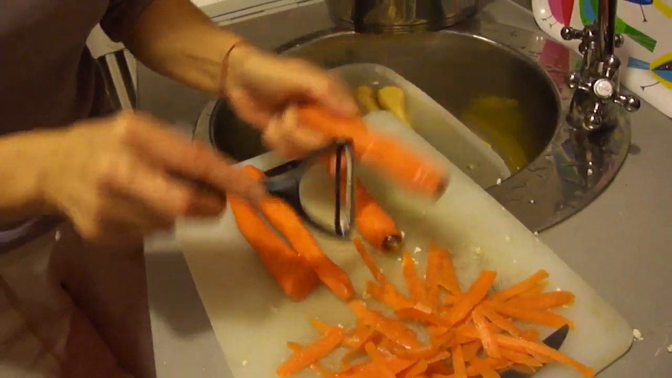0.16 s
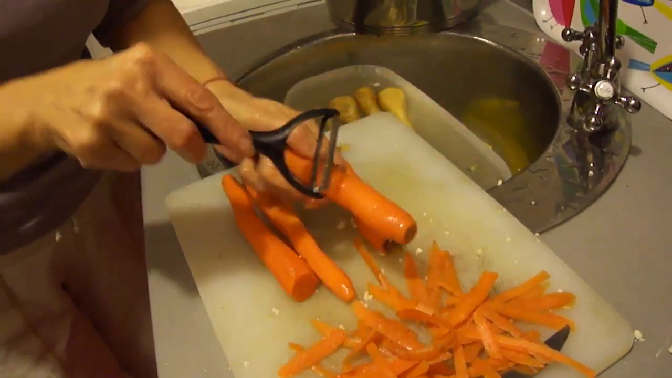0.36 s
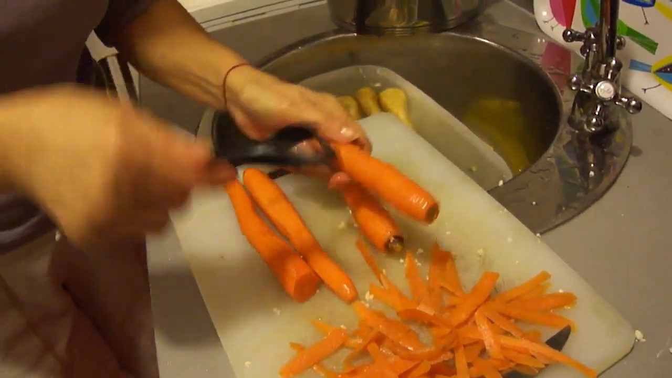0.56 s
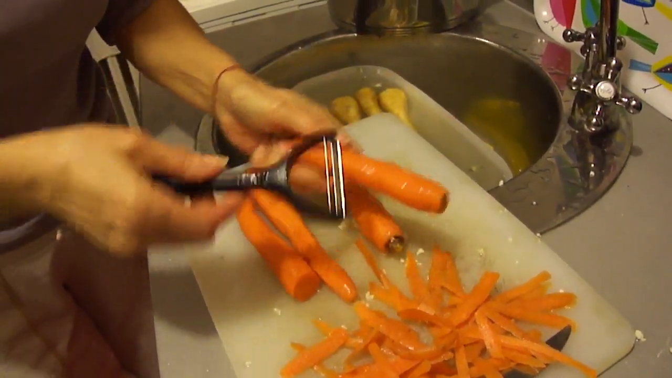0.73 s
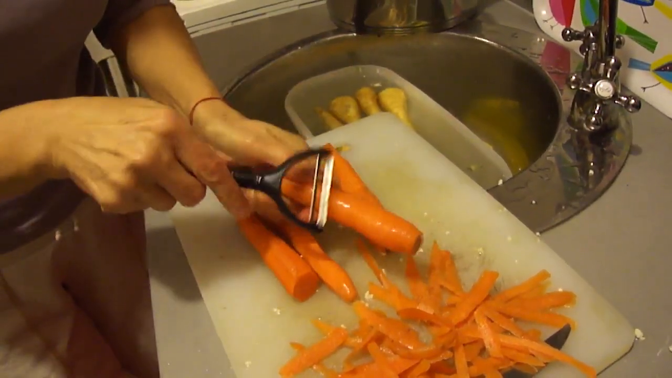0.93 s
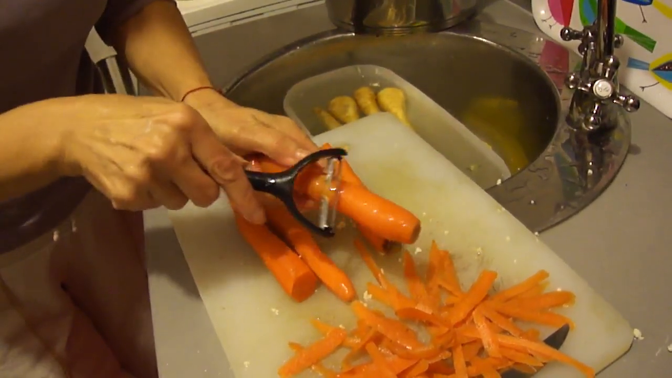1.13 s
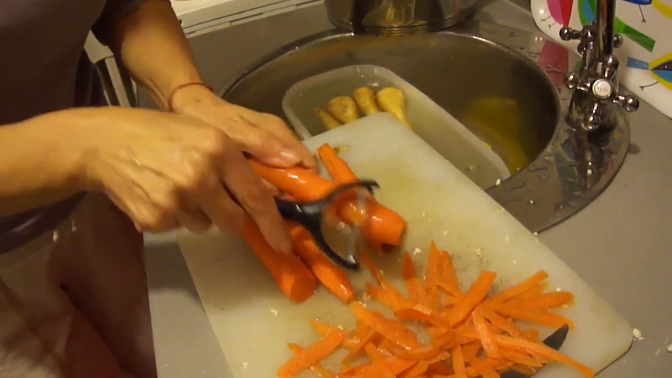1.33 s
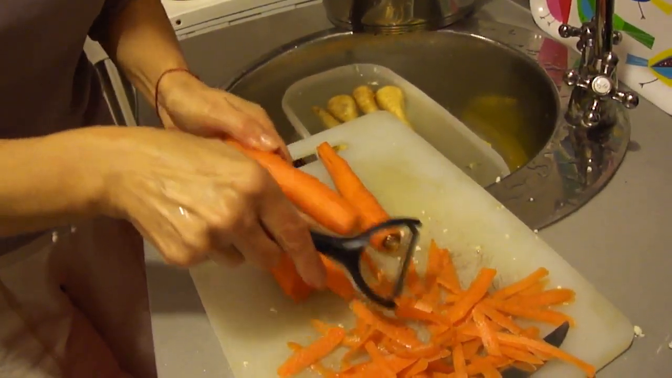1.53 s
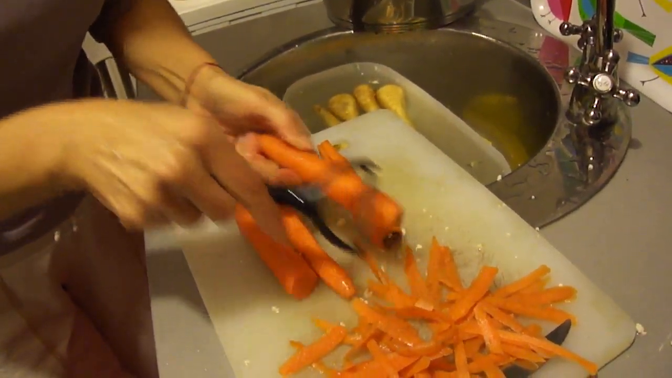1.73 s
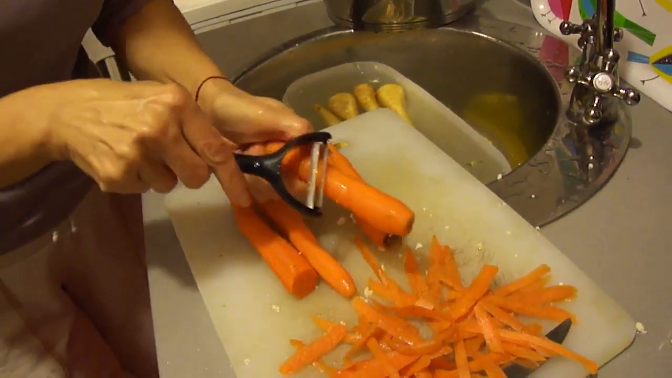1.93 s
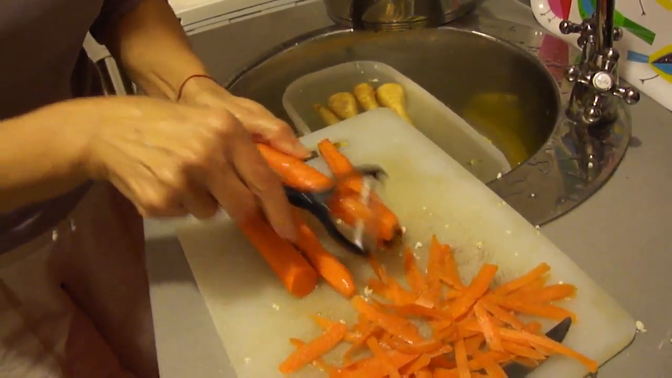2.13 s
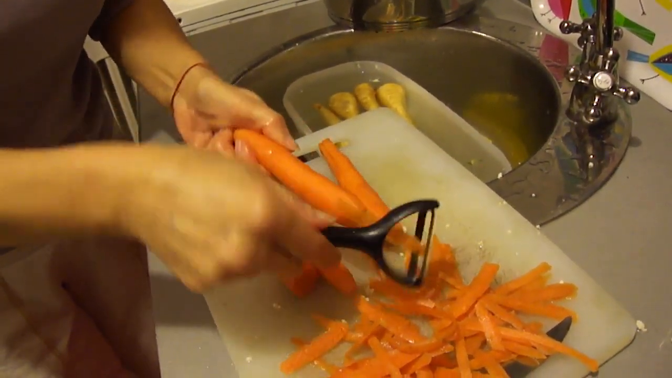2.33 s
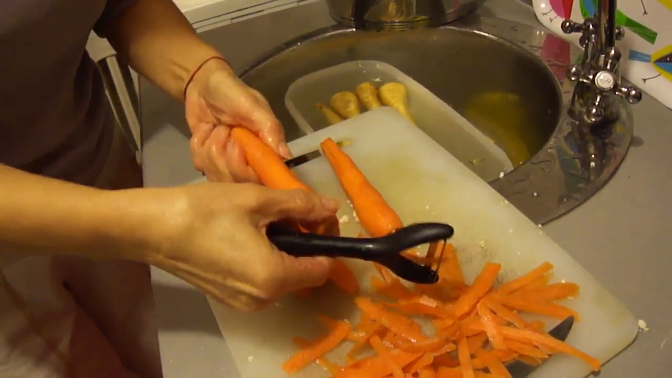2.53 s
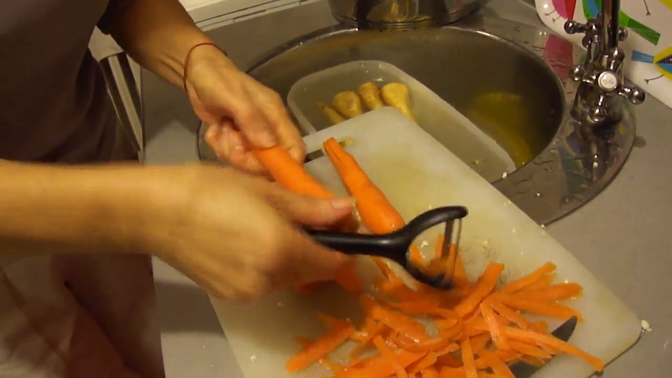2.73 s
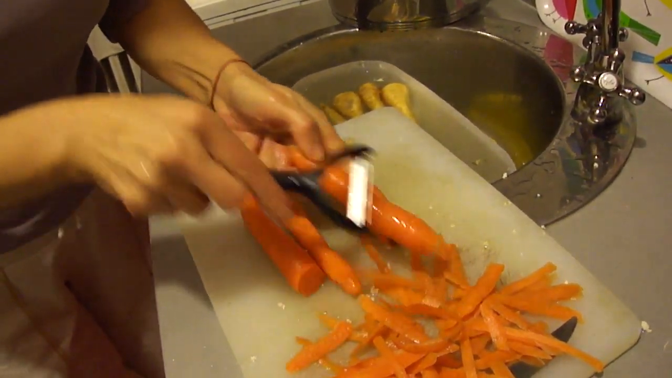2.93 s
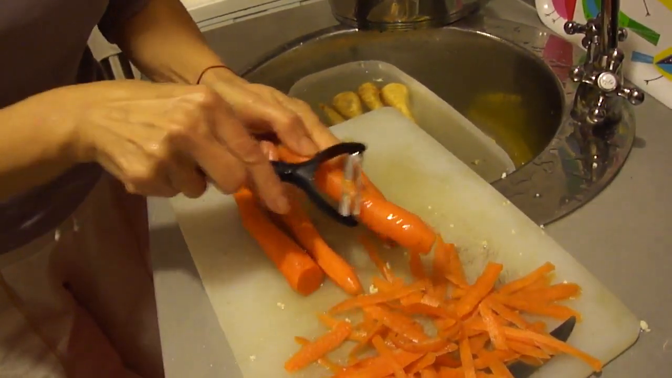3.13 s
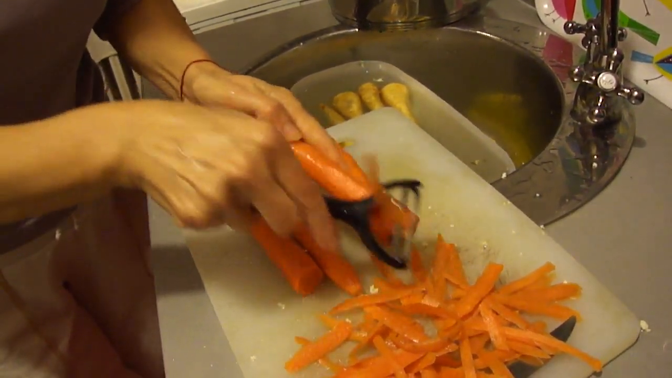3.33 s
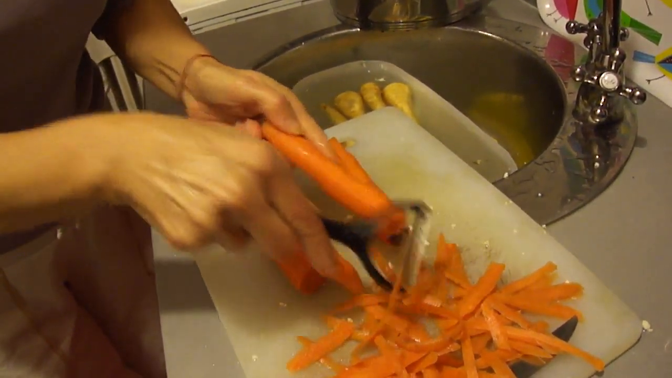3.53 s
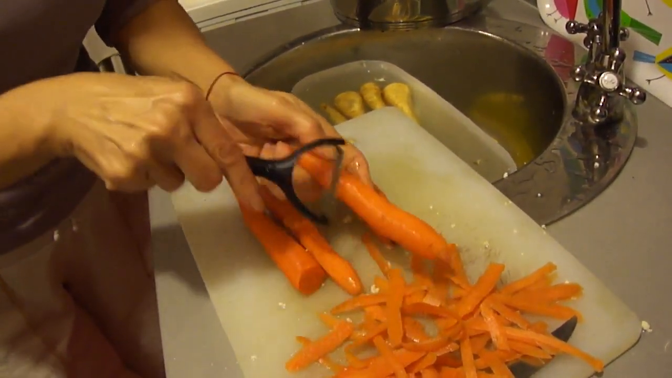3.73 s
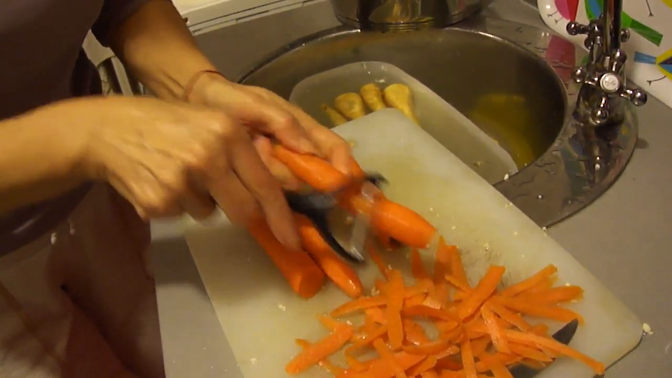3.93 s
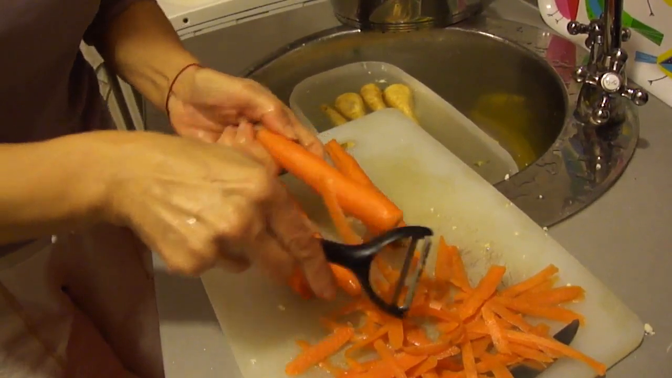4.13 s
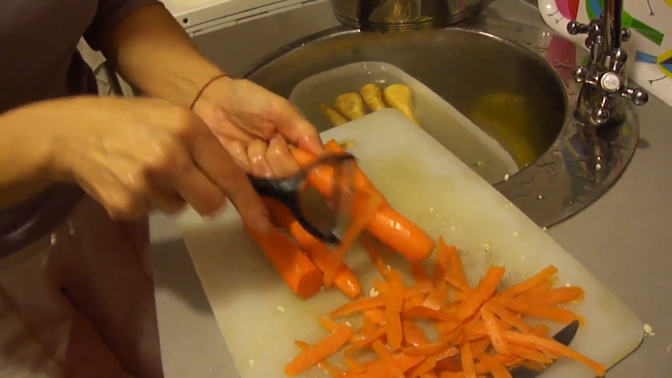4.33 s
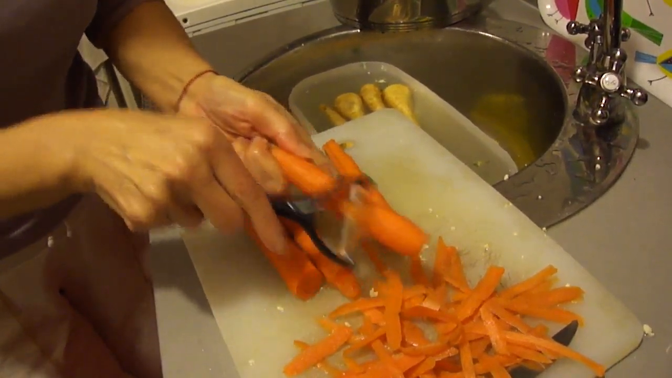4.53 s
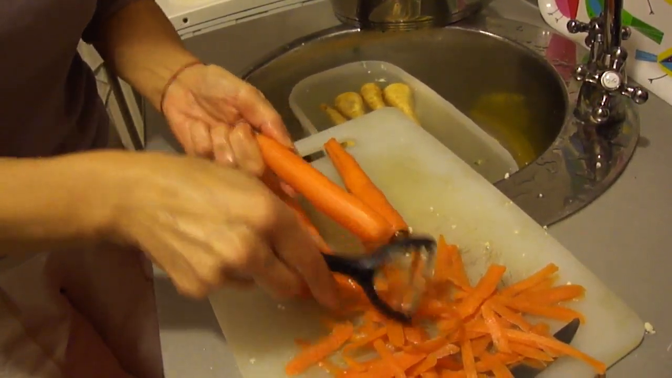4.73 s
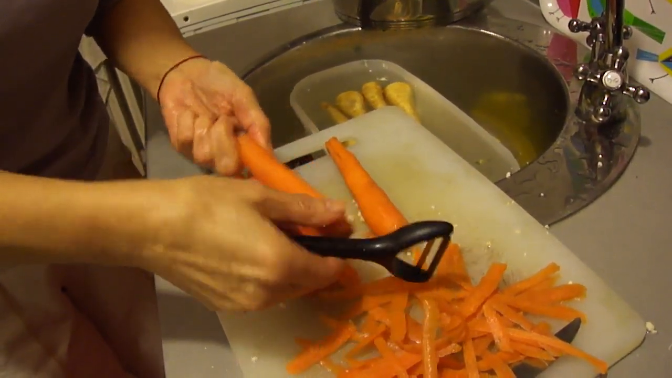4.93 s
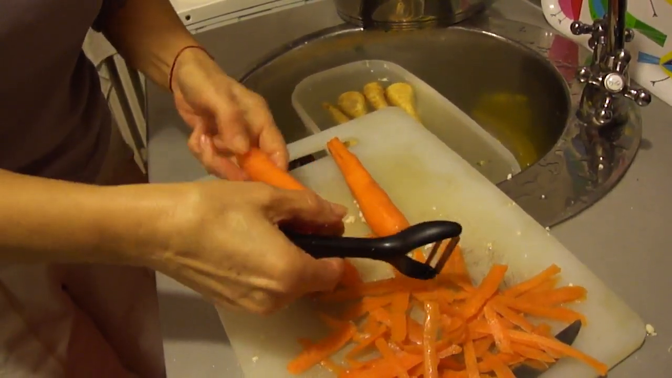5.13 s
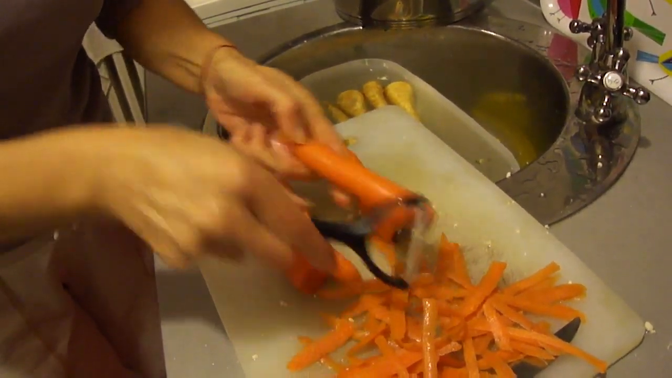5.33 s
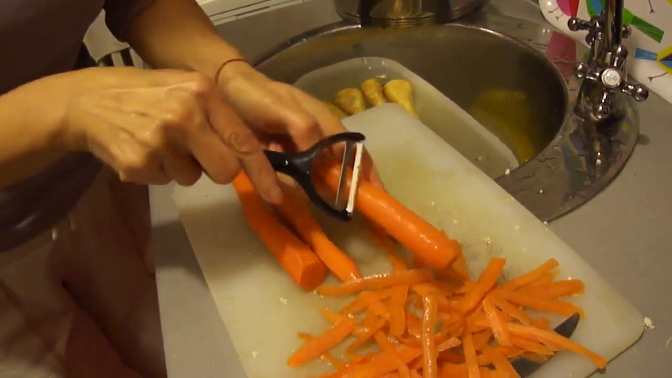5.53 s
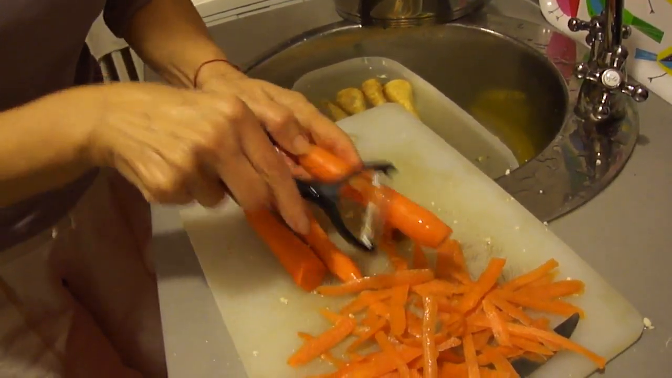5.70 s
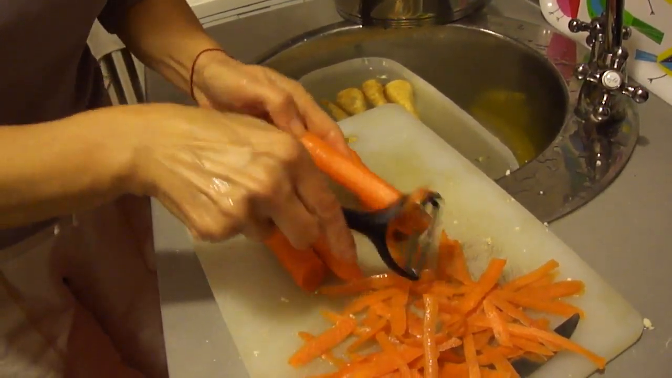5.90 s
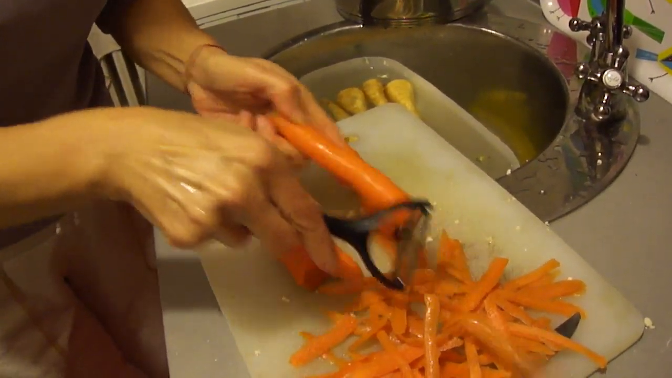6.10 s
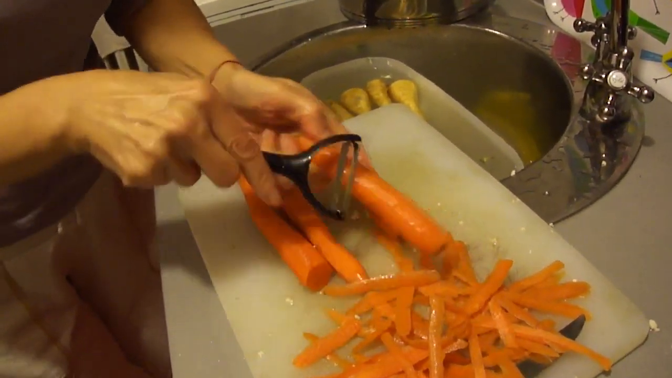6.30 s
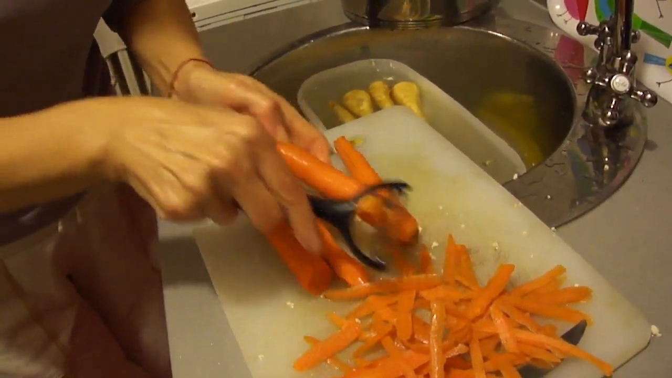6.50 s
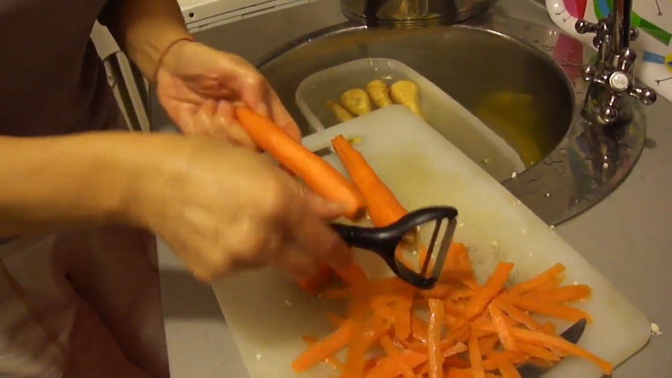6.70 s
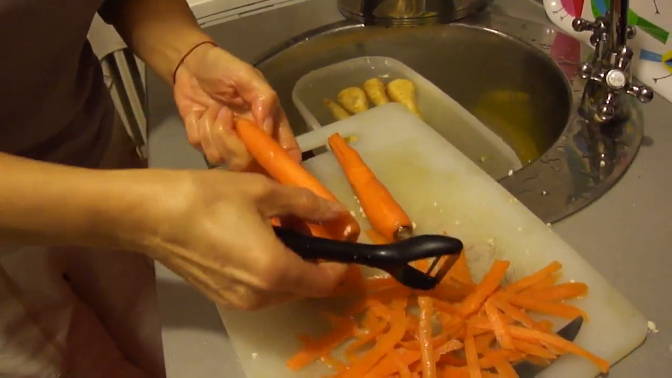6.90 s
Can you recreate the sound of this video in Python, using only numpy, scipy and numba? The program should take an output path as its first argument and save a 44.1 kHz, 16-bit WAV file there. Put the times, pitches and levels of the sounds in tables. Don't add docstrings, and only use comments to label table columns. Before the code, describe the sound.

Bright, hard clacks of a loose peeler blade introduce crunchy, fibrous scrapes along wet carrots. Short quick cuts come first, then strokes of about a third of a second that swell and fade toward the tip. Between groups come small metallic-plastic rattles and brief quiet gaps. The sound is close and mono, with a short kitchen reflection, steady soft hum and slightly overloaded loudest knocks.

```python
import sys
import numpy as np
from scipy import signal
from scipy.fft import rfft, irfft, next_fast_len
from scipy.io import wavfile
from numba import njit

SR = 44100
rng = np.random.default_rng(int(sys.argv[2]) if len(sys.argv) > 2 else 0)


def to_wav(sig):
    pcm = np.clip(np.atleast_2d(sig), -1, 1) * 32767
    pcm = np.round(pcm).astype(np.int16)
    wavfile.write(sys.argv[1], SR, pcm.T)


def rack_gain(trim_db):
    fader = np.asarray(trim_db, float)
    return 10 ** (fader / 20)


N = 306936

# [f/Hz, level/dB per Hz]
HUM_SPECTRUM = [(18, -28), (40, -27), (75, -14), (160, -3.5), (260, 0.5), (500, -2.5), (1170, -5),
                (1700, -9.5), (2500, -13), (4400, -17.5), (7000, -20.5), (9000, -22), (10800, -24.5),
                (22000, -70)]
HUM_DB = -48
# [f/Hz, level/dB rms]
MACHINE_TONES = [
    (88, -69),
    (7881, -70.5),
]

# [t/s, peak level/dB, low mode f/Hz, brightness/dB]
LANDINGS = [
    (1.1369, 0, 3800, -1.5),
    (2.0606, -1, 4300, 42),
    (2.38, -6, 2740, 21),
    (2.4892, -5.5, 3840, 0.5),
    (3.2517, -0.5, 3660, 4),
    (3.2543, -6, 3470, -4),
    (4.595, 0.5, 3820, -0.5),
    (5.7385, -11, 3500, 3),
    (6.165, -23, 3800, 0),
]
# [t/s, peak level/dB, low mode f/Hz, brightness/dB]
STOP_SLAMS = [
    (1.5599, -3.5, 4020, 16),
    (3.9388, 0, 4500, -2),
    (4.2318, -9.5, 2940, 0.5),
    (6.4982, 1.5, 4300, -4),
]
# [t/s, peak level/dB, low mode f/Hz, brightness/dB]
BLADE_FLIPS = [(0.0502, -16.5, 4030, -3), (.4534, -42, 2700, 12), (0.673, -22.5, 4500, -8),
               (2.6848, -30.5, 2400, -6), (2.887, -36, 3200, -7), (3.1342, -34.5, 2820, -19),
               (3.691, -15.5, 2310, -4.5), (4.8872, -18, 2680, 0), (4.9974, -41, 2800, 3),
               (5.0686, -9, 3230, -2.5), (5.1734, -30.5, 3170, -2), (5.4495, -35.5, 4550, -6),
               (6.1183, -16, 3020, -7), (6.1505, -30, 3210, -10), (6.2474, -32, 2870, -13),
               (6.2603, -22, 2790, -2), (6.7676, -17, 2720, 7), (6.935, -27.5, 4480, -9),
               (.4354, -40, 2700, 14), (2.148, -16, 3630, -15), (.635, -33, 4000, -6)]
# [t/s, peak level/dB, low mode f/Hz]
AIR_RATTLES = [(0.2295, -27, 4050), (0.617, -23, 4020), (0.6883, -27, 4050), (0.7922, -26.5, 3520),
               (0.9131, -19.5, 3200), (0.9385, -22.5, 4250), (0.9798, -21, 4200), (1.016, -26, 4300),
               (2.593, -28, 3180), (2.6564, -37.5, 3060), (2.7407, -38, 3030), (2.791, -29, 3140),
               (2.938, -51, 3350), (3.202, -22, 3940), (3.7608, -23, 3770), (5.181, -28.5, 4000),
               (5.397, -36.5, 3020), (5.6397, -38, 2850), (5.717, -23, 4300), (6.2545, -27, 3240),
               (6.2731, -23, 2330)]
# [t/s, peak level/dB, low mode f/Hz]
ROOT_RATTLES = [(1.4333, -14, 3680), (1.697, -17, 2530), (1.7134, -22, 2420), (3.5786, -17, 4300),
                (3.6186, -24, 2960), (3.952, -13.5, 3370), (4.0814, -31, 3570), (4.8719, -13.5, 4500),
                (5.7276, -30, 4070), (6.0854, -21, 3980), (6.8046, -15, 3000), (6.817, -27, 2710)]
AIR_BRIGHT_DB, ROOT_BRIGHT_DB = -6.5, -5.5
# [high mode f/Hz, chatter T60/s]
KNOCK_KINDS = [
    (4990, 0.041),
    (8440, 0.012),
    (8070, 0.074),
    (5350, 0.052),
    (5200, 0.036),
]
# [f/Hz, width/Hz, level/dB]
FRAME_MODES = [(2620, 1100, -1.5), (3086, 46, 8), (4050, 630, 8), (4563, 120, 19.5), (5290, 620, 13),
               (6120, 270, 8.5), (7600, 1200, -8), (8260, 260, -6), (10600, 1350, -22)]
# [f/Hz, T60/s, [(start t/s, level/dB)]]
STEEL_RINGS = [(8740, 0.09, [(3.693, -31.5), (5.0705, -24.5), (6.118, -30), (6.768, -38)]),
               (7980, .036, [(4.08, -37), (6.768, -27)]), (7700, 0.13, [(5.07, -35)]),
               (7280, 0.083, [(.69, -43)]), (5450, 0.054, [(.916, -25.5), (.982, -29), (2.491, -41),
               (5.072, -29)]), (4500, 0.062, [(5.069, -26), (6.936, -28.5)]),
               (4130, 0.024, [(.231, -27.5)]), (3047, 0.035, [(.795, -29.5), (.916, -21.5), (2.792, -42),
               (6.498, -19)]), (2700, 0.049, [(2.062, -14), (2.38, -16)]), (2500, 0.065, [(1.15, -24),
               (1.7, -30), (1.716, -31), (2.385, -25), (3.693, -40)]), (1925, 0.025, [(.796, -35),
               (.917, -29)]), (1190, 0.043, [(.689, -41), (2.49, -31), (3.694, -33), (5.07, -36)]),
               (1420, 0.19, [(6.565, -33), (6.585, -28.5)]), (920, 0.053, [(5.072, -36.5)]),
               (787, .044, [(1.825, -32.5)])]
# [t/s, level/dB]
AIR_THUDS = [
    (1.137, -22),
    (1.56, -19),
    (2.061, -16),
    (2.38, -24),
    (3.251, -22),
    (3.939, -15.5),
    (4.595, -23),
    (6.497, -21.5),
]
KITCHEN_T60_S, KITCHEN_DB = 0.19, -10.5

# [f/Hz, level/dB per Hz]
CELL_HISS = [(530, 10), (900, -24.5), (1530, -18.5), (1940, -18), (2370, -15), (3200, -4.5), (3590, -4),
             (5440, -9.5), (6100, -10.5), (7580, -14), (10800, -14), (14000, -24), (22000, -120)]
# [f/Hz, width/Hz, level/dB]
SKIN_MODES = [(2420, 155, 4.5), (2804, 74, 6.5), (2998, 130, 6), (2150, 68, -5.5), (1840, 260, -9)]
# [f/Hz, width/Hz, level/dB]
CORE_MODES = [(1220, 140, 1), (1410, 58, -5), (1535, 180, -6.5)]
# [t/s, level/dB]
SHORT_CUTS = [
    [(1.148, -29), (1.184, -45), (1.23, -54), (1.236, -46)],
    [(1.243, -28), (1.301, -29.5), (1.345, -68), (1.355, -43)],
    [(1.367, -21.5), (1.441, -21.5), (1.455, -48), (1.47, -38)],
    [(1.482, -29), (1.53, -20.5), (1.538, -24), (1.556, -27)],
    [(2.07, -23), (2.13, -42), (2.142, -37)],
    [(3.262, -35), (3.29, -27), (3.338, -51.5), (3.342, -32)],
    [(6.06, -54), (6.064, -48.5), (6.118, -39.5), (6.2, -73)],
]
# [t/s, level/dB]
LONG_CUTS = [
    [(1.572, -37), (1.592, -32.5), (1.644, -38.5), (1.654, -45), (1.688, -49), (1.698, -45), (1.774, -68),
     (1.78, -69)],
    [(2.149, -30), (2.211, -27.5), (2.229, -34), (2.237, -28.5), (2.317, -32), (2.385, -38.5), (2.401, -57),
     (2.47, -62)],
    [(3.35, -28), (3.358, -27.5), (3.434, -27.5), (3.448, -29.5), (3.542, -30), (3.55, -34), (3.578, -46),
     (3.67, -58.5)],
    [(3.946, -32), (3.954, -36), (3.964, -37), (3.998, -30.5), (4.106, -23.5), (4.24, -36), (4.242, -43),
     (4.31, -67.5)],
    [(4.602, -31), (4.606, -42), (4.62, -28.5), (4.704, -21), (4.756, -28.5), (4.78, -25.5), (4.872, -37.5),
     (4.94, -70)],
    [(5.722, -38.5), (5.738, -33.5), (5.826, -35), (5.844, -25), (6.0, -30), (6.016, -51), (6.028, -42),
     (6.05, -39)],
    [(6.505, -26), (6.513, -30), (6.587, -22), (6.679, -25.5), (6.799, -50), (6.807, -42), (6.835, -69),
     (6.86, -63.5)],
]
# [skin level/dB, skin gain toward tip/dB, juice level/dB, core level/dB, starting blade resonance f/Hz]
CARROT_SPOTS = [(10, -7, 3.5, 3, 4260), (1.5, 3, -3, -3, 3560), (0, 13, -4, 0, 3560),
                (-2.5, 5, 1, -4, 3530), (8, 7, 4.5, 3.5, 3800), (8, 0, -2, -2, 3470),
                (-7.5, 21.5, 5, -4, 3550), (0, 6, 0, 0, 3550), (-2, 7.5, 0, -2, 3530),
                (-1.5, 8.5, 3, 0.5, 3490), (4.5, -0.5, 0.5, -2.5, 3490), (-5.5, 11.5, 2, -2, 3420),
                (2.5, 7, 3, 5, 3800), (4.5, 1.5, 2, 1, 3580)]
FIRM_DB, LIGHT_DB, GRAZE_DB = -27.5, -42.5, -47
SKIN_DB, SKIN_GAIN = -10.5, 0.56
JUICE_DB, JUICE_GAIN, JUICE_TIP_DB = -9.5, 0.4, 0.5
CORE_DB, CORE_GAIN, CORE_TIP_DB = -23.5, 0.99, 4
BLADE_RISE_HZ_PER_S = 660

# [t/s, f/Hz, width/Hz, level/dB, half length/s]
FINGER_SLIP = (5.525, 5700, 350, -51, .018)
MIC_CUTOFF_HZ = 11000


def rms_one(x):
    return x / np.sqrt(np.mean(x ** 2) + 1e-20)


def coloured(x, points):
    size = next_fast_len(len(x))
    hz = np.maximum(np.arange(size // 2 + 1) * SR / size, 1)
    point_hz, point_db = np.array(points).T
    gain = rack_gain(np.interp(np.log(hz), np.log(point_hz), point_db))
    return rms_one(irfft(rfft(x, size) * gain, size)[:len(x)])


def drift(rate_hz):
    r = np.exp(-2 * np.pi * rate_hz / SR)
    wander = signal.lfilter([1], [1, -2 * r, r * r], rng.standard_normal(N + 9000))
    return rms_one(wander[9000:])


def resonance(x, hz, width_hz):
    r = np.exp(-np.pi * width_hz / SR)
    turn = np.cos(2 * np.pi * hz / SR)
    return signal.lfilter([(1 - r * r) / 2, 0, (r * r - 1) / 2], [1, -2 * r * turn, r * r], x)


def modes(x, table):
    return sum(rack_gain(db) * resonance(x, hz, width) * (-1) ** k for k, (hz, width, db) in enumerate(table))


def hum():
    out = rack_gain(HUM_DB + 0.5 * drift(0.88)) * coloured(rng.standard_normal(N), HUM_SPECTRUM)
    for hz, db in MACHINE_TONES:
        phase = 2 * np.pi * np.cumsum(hz * (1 + 0.002 * drift(20))) / SR
        out += rack_gain(db + 3 + 0.9 * drift(5)) * np.sin(phase)
    return out


def knocks():
    air = [(*row, AIR_BRIGHT_DB) for row in AIR_RATTLES]
    root = [(*row, ROOT_BRIGHT_DB) for row in ROOT_RATTLES]
    groups = [LANDINGS, STOP_SLAMS, BLADE_FLIPS, air, root]
    return [(s, db, low_hz, high_hz, bright_db, t60)
            for rows, (high_hz, t60) in zip(groups, KNOCK_KINDS)
            for s, db, low_hz, bright_db in rows]


def pivot_clacks(out, t):
    low = signal.butter(3, [2450, 5200], "band", fs=SR, output="sos")
    high = signal.butter(2, 5000, "high", fs=SR, output="sos")
    under = signal.butter(1, [500, 2300], "band", fs=SR, output="sos")
    for s, db, low_hz, high_hz, bright_db, t60 in knocks():
        contact = rack_gain(-60 * t / 0.0041)
        train = rack_gain(-9.5 - 60 * t / max(t60, 0.004))
        shape = (1 - np.exp(-t / 0.00057)) * (contact + train)
        chatter = rng.standard_normal(len(t)) * (rng.random(len(t)) < 0.5) * shape
        chatter[8] += 1.2

        uneven_db = rng.normal(0, 2.5, len(FRAME_MODES))
        struck = [(hz, width, level + g) for (hz, width, level), g in zip(FRAME_MODES, uneven_db)]
        frame = chatter + rack_gain(-4.5) * modes(chatter, struck)
        dull = signal.sosfilt(low, frame + rack_gain(11) * resonance(chatter, low_hz, 400))
        bright = signal.sosfilt(high, frame + rack_gain(8) * resonance(chatter, high_hz, 500))
        knock = dull / np.abs(dull).max()
        knock += rack_gain(bright_db + 4.5) * bright / np.abs(bright).max()
        knock += rack_gain(-2.0) * signal.sosfilt(under, chatter) / np.abs(chatter).max()

        lead_in = rng.standard_normal(300) * rack_gain(np.linspace(-52, -20, 300))
        start = round(s * SR)
        out[start - 300:][:300] += rack_gain(db) * signal.sosfilt(low, lead_in)
        out[start:][:len(t)] += rack_gain(db - 0.05) * knock / np.abs(knock).max()


def steel_rings(out, t):
    for hz, t60, hits in STEEL_RINGS:
        ring = np.sin(2 * np.pi * hz * t) * (1 - np.exp(-t / 0.00021))
        for s, db in hits:
            out[round(s * SR):][:len(t)] += rack_gain(db - 60 * t / t60) * ring


def air_thuds(out, t):
    pulse = np.exp(-t / 0.0002) + 0.082 * np.exp(-t / 0.0013)
    pulse *= 1 - np.exp(-t / 0.0001)
    for s, db in AIR_THUDS:
        out[round(s * SR):][:len(t)] += rack_gain(db) * pulse


def clacks():
    out, t = np.zeros(N + SR), np.arange(SR // 4) / SR
    pivot_clacks(out, t)
    steel_rings(out, t)
    air_thuds(out, t)
    return out[:N]


def kitchen(x):
    t = np.arange(SR // 2) / SR
    tail = rng.standard_normal(len(t)) * rack_gain(-60 * t / KITCHEN_T60_S) * (t > 0.003)
    tail = signal.lfilter([1], [1, -0.3], tail)
    return rack_gain(KITCHEN_DB) * signal.fftconvolve(x, tail / np.sqrt(np.sum(tail ** 2)))[:N]


@njit
def gliding(x, turn, r):
    y = np.zeros(len(x))
    for i in range(2, len(x)):
        y[i] = x[i] - x[i - 2] + 2 * r * turn[i] * y[i - 1] - r * r * y[i - 2]
    return y


def cell_bursts(per_s, spread_db):
    size_db = spread_db * np.minimum(rng.exponential(1, N), 5)
    snaps = rack_gain(size_db) * rng.choice([-1, 1], N)
    return rms_one(snaps * (rng.random(N) < per_s / SR))


def patchy(x, patch_db):
    edges = np.geomspace(800, 13000, 13)
    out = np.zeros(N)
    for k, pair in enumerate(zip(edges, edges[1:])):
        band = signal.sosfilt(signal.butter(2, pair, "band", fs=SR, output="sos"), x)
        out += band * rack_gain(patch_db * drift(14)) * (-1) ** k
    return rms_one(out)


def edge_pressure():
    rows = []
    strokes = sorted(SHORT_CUTS + LONG_CUTS, key=lambda stroke: stroke[0][0])
    for stroke, (skin, tip, juice, core, hz) in zip(strokes, CARROT_SPOTS):
        s, blade_db = np.transpose(stroke)
        light = FIRM_DB - np.maximum(blade_db, LIGHT_DB)
        graze = FIRM_DB - np.maximum(blade_db, GRAZE_DB)
        along = (s - s[0]) / 0.3
        skin_db = skin + SKIN_DB + SKIN_GAIN * graze + tip * along
        juice_db = juice + JUICE_DB + JUICE_GAIN * light + JUICE_TIP_DB * along
        core_db = core + CORE_DB + CORE_GAIN * light + CORE_TIP_DB * along
        blade_hz = hz + BLADE_RISE_HZ_PER_S * (s - s[0])
        rows.append([s, blade_db, skin_db, juice_db, core_db, blade_hz])
    return np.hstack(rows)


def peeling():
    t = np.arange(N) / SR
    s, *curves = edge_pressure()
    blade_db, skin_db, juice_db, core_db, blade_hz = [np.interp(t, s, curve) for curve in curves]
    touching = np.zeros(N)
    for stroke in SHORT_CUTS + LONG_CUTS:
        first, last = stroke[0][0], stroke[-1][0]
        touching += np.interp(t, [first - 0.008, first, last, last + 0.064], [0, 1, 1, 0])

    cells = cell_bursts(5000, spread_db=3.7) * rack_gain(2.0 * drift(70))
    turn = np.cos(2 * np.pi * blade_hz / SR)
    blade = gliding(cells, turn, np.exp(-np.pi * 300 / SR))
    blade = gliding(blade, turn, np.exp(-np.pi * 900 / SR))
    spray = cell_bursts(9000, spread_db=3.6) * rack_gain(0.4 * drift(60))
    hiss = patchy(coloured(spray, CELL_HISS), patch_db=3.0)

    mix = rack_gain(-2.0) * rms_one(blade)
    mix += rack_gain(juice_db + 6.5) * hiss
    mix += rack_gain(skin_db - 1.5) * rms_one(modes(cells, SKIN_MODES))
    mix += rack_gain(core_db) * rms_one(modes(cells, CORE_MODES))
    return np.minimum(touching, 1) * rack_gain(blade_db) * mix


def squeak():
    s, hz, width, db, half_s = FINGER_SLIP
    swell = np.exp(-((np.arange(N) / SR - s) / half_s) ** 2)
    return rack_gain(db) * swell * rms_one(resonance(rng.standard_normal(N), hz, width))


def scene():
    hands = clacks() + peeling() + squeak()
    return np.tile(hands + kitchen(hands) + hum(), (2, 1))


def top_cut(x):
    return signal.sosfilt(signal.butter(12, 12350, fs=SR, output="sos"), x)


def record(dry):
    t = np.arange(N) / SR
    over_db = np.maximum(20 * np.log10(np.abs(dry[0]) + 1e-9) + 12, 0)
    held_db = np.maximum.accumulate(over_db + 90 * t) - 90 * t
    duck_db = signal.lfilter([0.01], [1, -0.99], held_db)
    steep = signal.ellip(10, 0.5, 60, MIC_CUTOFF_HZ, fs=SR, output="sos")
    cut = signal.sosfilt(steep, dry * rack_gain(-0.4 * duck_db))
    mix = cut - 0.045 * cut ** 3
    return top_cut(mix)


dry = scene()
out = record(dry)
to_wav(out)
```